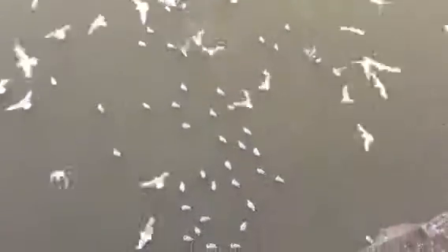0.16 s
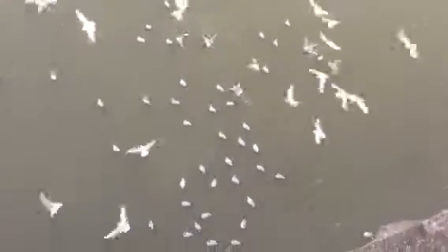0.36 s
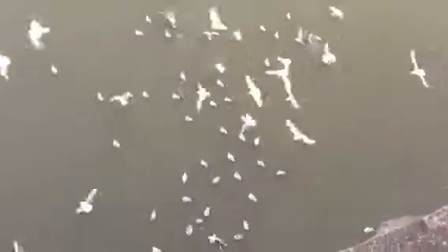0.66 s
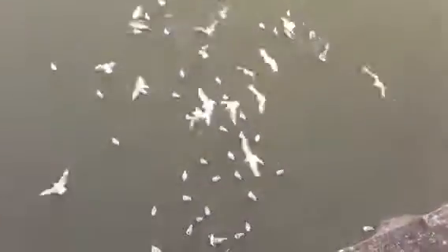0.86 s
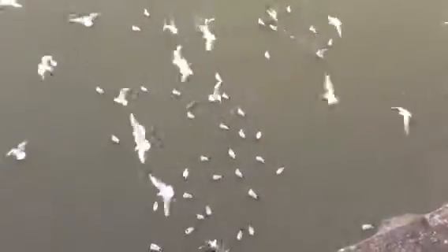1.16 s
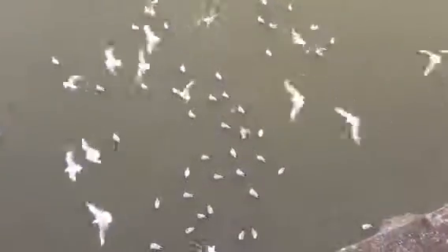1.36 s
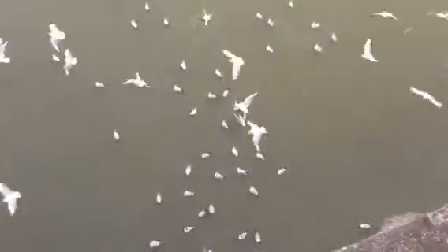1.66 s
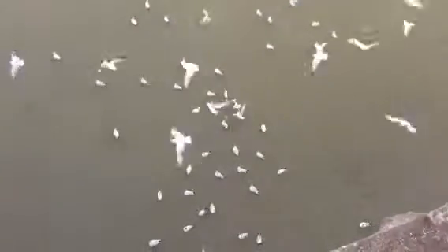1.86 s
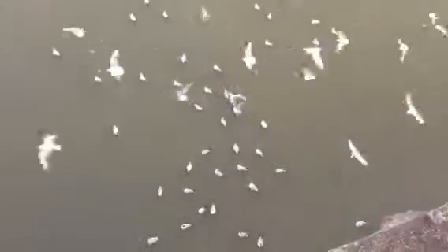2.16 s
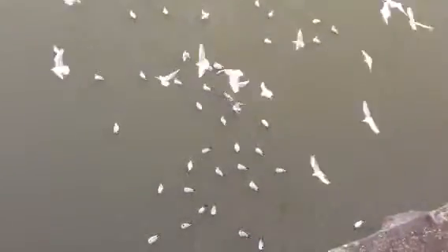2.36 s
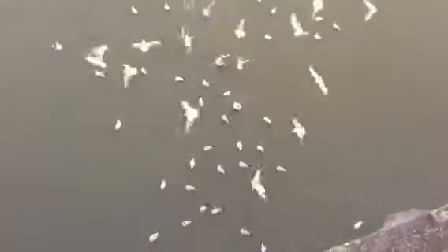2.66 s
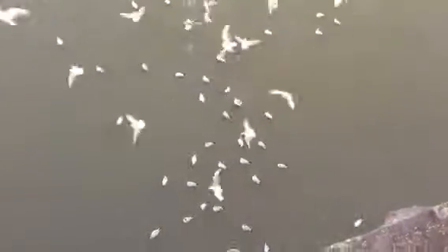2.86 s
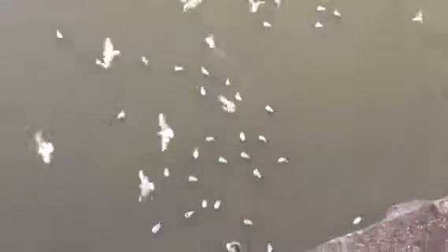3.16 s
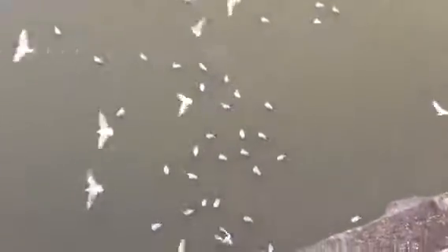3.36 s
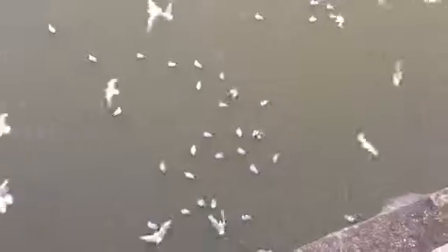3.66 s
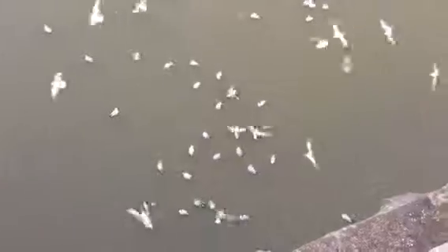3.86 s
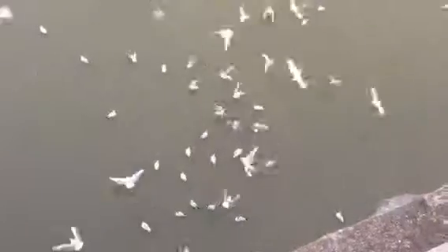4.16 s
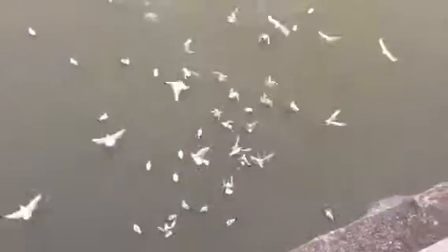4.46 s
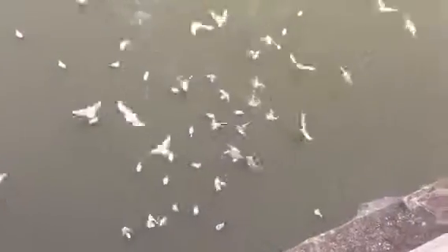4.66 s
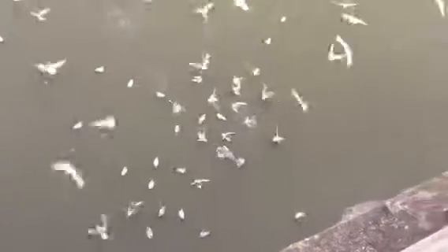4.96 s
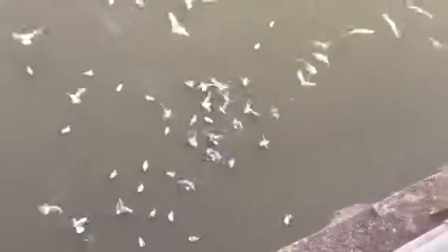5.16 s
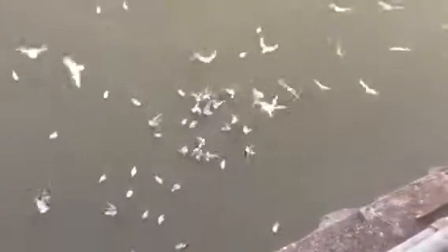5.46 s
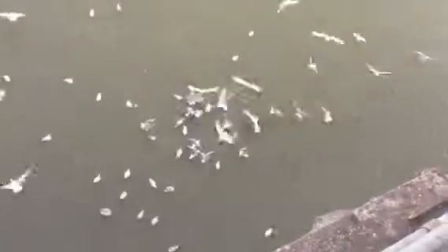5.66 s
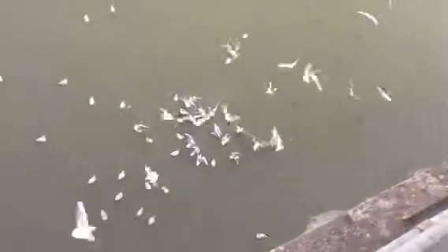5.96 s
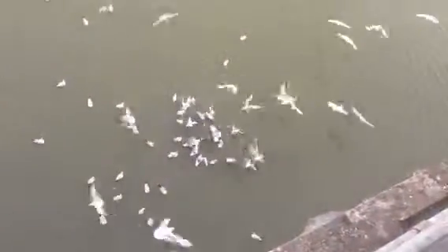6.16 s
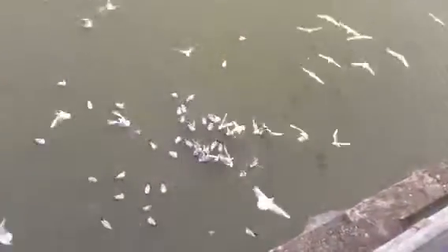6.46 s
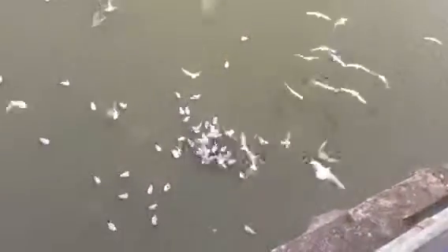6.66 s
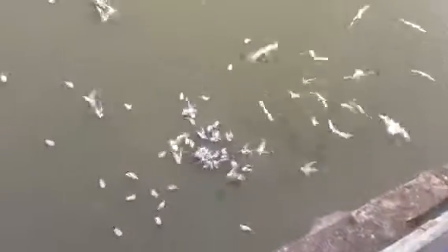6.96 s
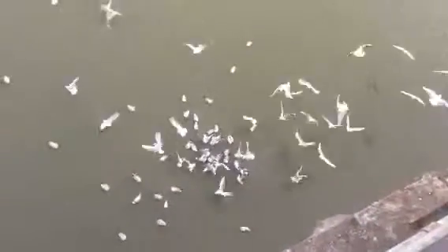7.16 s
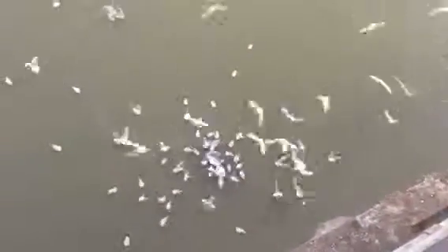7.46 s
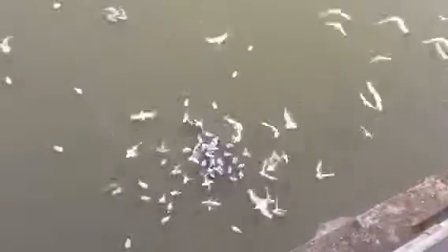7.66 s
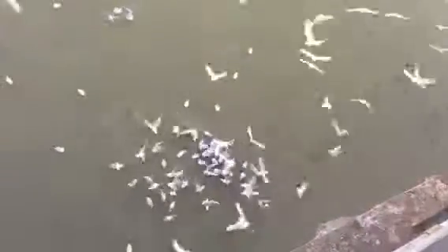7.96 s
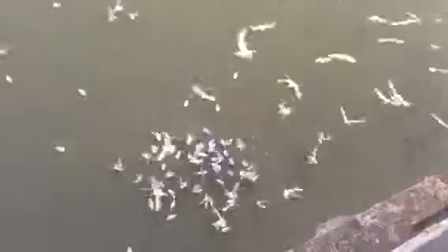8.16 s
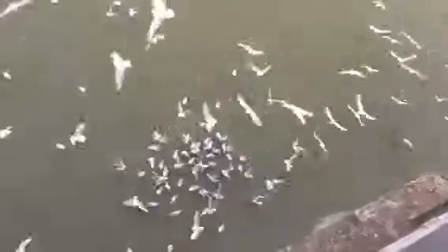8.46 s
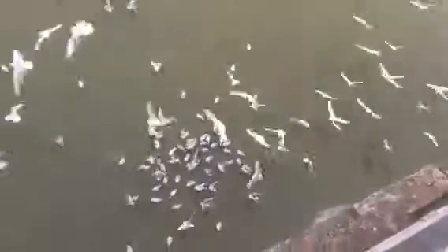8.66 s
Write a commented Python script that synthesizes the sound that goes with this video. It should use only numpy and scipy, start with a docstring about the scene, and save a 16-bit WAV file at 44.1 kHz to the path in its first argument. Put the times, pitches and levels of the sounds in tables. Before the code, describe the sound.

Gulls call over open water below a quay, each cry a short arch of pitch, raspy or trilled and reedy, with a weak echo. For the first 2 seconds the cries are scattered and fairly soft. From about 2 to 3.2 seconds they thin to a few faint calls and a thin falling whistle. Small dry ticks sound nearby, the clearest at about 2.7 and 4.1 seconds. From 3.4 seconds the screams and rasps return louder and more often, with occasional short yelps. Around 4.5 seconds a chorus of farther gulls swells behind them, growing brighter and busier until the end, near 9 seconds. Short falling whistles cut through at about 5.9 and 8 seconds, and strong cries stand out around 6.1 and 7.3 seconds. A faint wash of stirred water and a low outdoor rumble continue throughout.

```python
"""You hear gulls crying over open water below a quay, more and more as the feeding flock crowds together.
Each cry is a short arch of pitch near 1 kHz, trilled and reedy or torn into a rasp. The bird's voice
box buzzes, and its throat and open bill shape the sound. A few birds give short yelps or thin whistles.
Farther birds blur into a chorus, and the water and the quay wall send back a weak echo.
Small ticks sound nearby, over the wash of stirred water and a low outdoor rumble."""
import sys
import numpy as np
from scipy import signal
from scipy.fft import rfft, irfft, next_fast_len
from scipy.io import wavfile
from scipy.ndimage import uniform_filter1d, map_coordinates

SR = 44100
rng = np.random.default_rng(int(sys.argv[2]) if len(sys.argv) > 2 else 0)


def wav_out(sig):
    """Save sig, one row per channel (or a flat mono array), as 16-bit PCM at SR to the path in sys.argv[1]."""
    wavfile.write(sys.argv[1], SR, np.round(np.clip(np.atleast_2d(sig).T, -1, 1) * 32767).astype(np.int16))


N = 388080


def rasps(rough=0.859, excitement_db_per_s=0.69, margin_s=0.011):
    """Harsh cries of nearby gulls; a wider bill and growing excitement make them brighter."""
    # rasps: t/s, length/s, level/dB, bill resonance/Hz, fall of pitch/octaves (below 0 it rises)
    calls = [(0.016, 0.1, -45, 2110, -0.088), (0.077, 0.092, -39, 1570, 0.032),
             (0.185, 0.049, -46, 1507, 0.1), (0.33, 0.088, -38, 1900, 0.63),
             (0.385, 0.11, -42.5, 1786, 0.19), (0.555, 0.089, -43, 1953, 0.077),
             (0.74, 0.082, -43, 3340, 0.041), (0.781, 0.061, -41.5, 1818, 0.53),
             (0.971, 0.057, -49.5, 1446, 0.26), (1.204, 0.076, -48.5, 1863, 0.049),
             (1.687, 0.084, -38.5, 1976, -0.075), (2.819, 0.073, -50, 1557, 0.18),
             (3.247, 0.06, -41.5, 2400, 0.12), (3.716, 0.072, -36.5, 2340, 0.049),
             (4.05, 0.092, -36.5, 2553, 0.14), (4.368, 0.071, -34.5, 2610, -0.14),
             (4.462, 0.045, -33.5, 2414, -0.068), (5.054, 0.032, -43, 1850, 0.064),
             (5.415, 0.085, -35.5, 2117, 0.12), (5.564, 0.093, -36.5, 4120, -0.093),
             (5.63, 0.086, -32.5, 2515, -0.037), (5.853, 0.12, -30.5, 2860, 0.25),
             (6.068, 0.097, -25, 2270, -0.076), (6.259, 0.13, -27, 2404, 0.037),
             (6.358, 0.068, -36.5, 1994, 0.35), (6.49, 0.096, -33, 2400, -0.082),
             (6.704, 0.12, -28.5, 3075, 0.046), (6.95, 0.14, -34, 1977, 0.13),
             (7.754, 0.097, -37, 2010, -0.022), (8.051, 0.097, -29.5, 2360, 0.34),
             (8.135, 0.043, -33.5, 2620, 0.31), (8.201, 0.091, -31.5, 2896, -0.00032),
             (8.431, 0.093, -31, 1970, 0.037), (8.524, 0.051, -34, 2066, 0.22),
             (8.699, 0.066, -35.5, 2600, 0.054), (8.755, 0.065, -32.5, 2615, -0.08)]
    out = np.zeros(N)
    for start, length, db, bill_hz, fall in calls:
        opening = np.log2(bill_hz / 2300)
        pitch_hz = 950 * 2 ** (opening / 5)
        bright_db = 2.03 + 7 * opening + excitement_db_per_s * start
        sound = cry(length + 2 * margin_s, db, pitch_hz, bill_hz, bright_db, rough, fall)
        add(out, start - margin_s, sound)
    return out


def cry(length, db, pitch_hz, bill_hz, bright_db, rough, fall, bill_db=9, trill_hz=63, ripple_db=2.4):
    """One cry: the voice box buzzes, flutters and breaks into noise when forced (rough, 0 to 1)."""
    # how a gull's throat colours its voice: f/Hz, level/dB
    throat = [(60, -24), (1050, -12), (1350, 6), (1700, 7.5), (2100, 8.5), (3300, 1.5), (4400, -1),
              (5700, -10), (7000, -15), (8500, -21), (10500, -17), (12000, -21), (14500, -18)]
    size, rough = int(max(length, .02) * SR), np.clip(rough, 0, 1)
    u = np.linspace(-1, 1, size)  # start to end of the cry
    trill = np.clip(1.161 - rough, 0, 1)  # the cleaner the voice, the deeper its trill
    beats = np.cumsum(trill_hz * (1 + .22 * wander(rng, size, 82.8))) / SR
    flutter = abs(np.sin(np.pi * beats))  # rounded bursts with sharp gaps
    chirp = flutter / 2 + beats % 1 - 1  # pitch climbs through each burst and drops back
    waver = .02 * wander(rng, size, 50)
    jitter = .05 * rough * wander(rng, size, 1400)
    cycles = np.cumsum(pitch_hz * (1 + .1 * trill * chirp + waver + jitter)) / SR
    buzz = evened(sum(np.cos(2 * np.pi * (k * cycles + rng.random())) for k in range(1, 10)))
    # strong and weak cycles take turns
    buzz *= 1 + 1.1 * rough ** 2 * wander(rng, size, 120) * np.cos(np.pi * cycles)
    noise = wander(rng, size, SR) * (1 + 0.31 * np.cos(2 * np.pi * cycles))
    noise *= gain_of(2.7 * wander(rng, size, 471))
    noise = evened(signal.lfilter(*signal.butter(2, 6200, fs=SR), noise)) / np.sqrt(2)
    noise_share = .9 * rough ** 1.7
    source = np.sqrt(1 - noise_share) * buzz + np.sqrt(noise_share) * noise
    source *= 1 - trill + trill * flutter
    source *= gain_of(ripple_db * wander(rng, size, 60) / 2)  # no two bursts are equally strong
    ripple_hz = np.arange(0, SR / 2, 450)
    ripple = ripple_db * rng.standard_normal(len(ripple_hz))  # each windpipe has its own peaks and dips
    voice = coloured(source, lambda f: (
        read(throat, f) + np.interp(f, ripple_hz, ripple) + tilt(f, bright_db)
        + bill_db * hump(f, bill_hz, 0.036 * (.5 + rough))
        + (1 - rough) * 10 * hump(f, 5550, 0.047)))  # a clean voice also rings high in the throat
    # as the bill opens and shuts, pitch and resonances rise and fall together
    bend = (1 + .22 * (1 + rough) / 2 * (1 / 5 - u ** 2)) * 2 ** (-fall * u / 2)
    voice = map_coordinates(voice, [np.cumsum(bend)], mode="mirror")
    fades_s = .035 + .1 * rough  # harsh cries swell and fade more slowly
    pressure = signal.windows.tukey(size, fades_s / (size / SR)) * gain_of(-4 * u ** 2)
    dull = signal.filtfilt(*signal.butter(2, 2800, fs=SR), voice)  # weak pressure loses the treble
    direct = (dull + np.sqrt(pressure) * (voice - dull)) * pressure ** .8
    lag = int(rng.uniform(.0005, .005) * SR)  # the water below mirrors the cry a moment later
    return gain_of(db) * evened(np.pad(direct, (0, lag)) + .5 * np.pad(direct, (lag, 0)))


def screams(rise=0.08, drop=0.167, bright_db=-0.5, strain_db_per_octave=14):
    """Reedy calls of nearby gulls; the trilled ones get brighter as the pitch is strained upward."""
    # trilled screams: t/s, length/s, level/dB, middle pitch/Hz, bill resonance/Hz
    trilled = [(0.631, 0.1, -41, 820, 2470), (0.918, 0.063, -41.5, 887, 2600),
               (1.107, 0.095, -40.5, 855, 2520), (1.258, 0.059, -47.5, 904, 2700),
               (1.367, 0.076, -37, 994, 1950), (1.78, 0.073, -38.5, 930, 2880),
               (2.155, 0.056, -44.5, 874, 2580), (3.443, 0.12, -32, 1231, 3600),
               (3.667, 0.059, -32.5, 1086, 5430), (3.839, 0.1, -31, 1082, 1870),
               (4.132, 0.19, -29, 1103, 5300), (4.418, 0.06, -33.5, 1003, 2570),
               (4.676, 0.075, -30.5, 1034, 2800), (4.807, 0.081, -30.5, 868, 2580),
               (4.862, 0.074, -31, 963, 2720), (4.929, 0.07, -31.5, 926, 2800),
               (5.202, 0.098, -36.5, 999, 1920), (5.464, 0.0607, -31, 1073, 3140),
               (5.686, 0.055, -27.5, 1060, 1870), (6, 0.081, -31, 1197, 2450),
               (6.165, 0.048, -33, 1154, 3420), (6.611, 0.041, -40, 1085, 2260),
               (6.803, 0.062, -35.5, 1090, 2840), (6.862, 0.066, -33.5, 1138, 2930),
               (7.2, 0.073, -30.5, 989, 2780), (7.293, 0.19, -26.5, 1016, 2720)]
    # cleaner, held screams: t/s, length/s, level/dB, middle pitch/Hz, bill resonance/Hz
    held = [(4.743, 0.068, -32, 1080, 2170), (7.462, 0.17, -31.5, 1075, 4360),
            (7.643, 0.068, -35, 1010, 3980), (7.832, 0.16, -30, 1127, 5470)]
    out = np.zeros(N)
    sag = np.array([rise, 0, drop])  # share of the pitch lost at the start, middle and end
    for start, length, db, pitch_hz, bill_hz in trilled:
        strain_db = strain_db_per_octave * np.log2(pitch_hz / 1050)
        rough = min(.4 + 2 * length, .65)  # longer screams are rougher
        add(out, start, scream(length, db, pitch_hz * (1 - sag), bill_hz, bright_db + strain_db, rough))
    for start, length, db, pitch_hz, bill_hz in held:
        add(out, start, scream(length, db, pitch_hz * (1 - sag / 2), bill_hz, bright_db, rough=0.25))
    return out


def scream(length, db, pitches, bill_hz, bright_db, rough, trill_hz=63, fades_s=.042):
    """One scream: a stack of harmonics on an arch of pitch; each trill burst lifts pitch and level."""
    # how a screaming gull's throat colours its voice: f/Hz, level/dB
    throat = [(300, -40), (1100, -16), (1600, 5), (2100, 5.5), (3100, 4.5), (4400, 1.5), (4900, -4),
              (5500, 1.5), (6600, -4), (8000, -13), (10500, -31.5), (12000, -56)]
    size = int(length * SR)
    u = np.linspace(-1, 1, size)  # start to end of the scream
    beats = np.cumsum(trill_hz * (1 + .2 * wander(rng, size, 79.8))) / SR
    burst = abs(np.sin(np.pi * beats))
    arch_hz = glide(pitches, u)
    bend = arch_hz / arch_hz.max()  # the resonances ride on the arch
    waver = .014 * wander(rng, size, 60)
    jitter = .035 * rough * wander(rng, size, 1400)
    hz = arch_hz * (1 + .17 * rough * (burst - np.pi / 4) + waver + jitter)
    cycles = np.cumsum(hz) / SR
    pressure = signal.windows.tukey(size, fades_s / length)
    gap_db = -12 * rough * (1 - burst * pressure) ** 2
    voice = np.zeros(size)
    for k in range(1, 15):
        f = k * hz
        colour_db = read(throat, f / np.sqrt(bend)) + tilt(f, bright_db)
        colour_db += 6 * hump(f / bend, bill_hz, 0.064)
        flicker_db = 4 * wander(rng, size, 42.8)
        hoarseness = 1 + .9 * rough * wander(rng, size, 1100)
        harmonic = np.cos(2 * np.pi * (k * cycles + rng.random()))
        voice += gain_of(colour_db + gap_db + flicker_db) * hoarseness * harmonic
    breath = coloured(rng.standard_normal(size), lambda f: read(throat, f) + tilt(f, bright_db))
    voice = evened(voice) + .7 * rough * breath * burst  # rushing air tears through every burst
    fizz = coloured(rng.standard_normal(size), lambda f: 40 * hump(f, 9000, 0.45))
    voice += rough * gain_of(-17) * evened(fizz * burst ** 2)  # and fizzes at its top
    return gain_of(db) * evened(voice * pressure * gain_of(-3 * u ** 2))


def yelps(highest_pitch_hz=1100):
    """Short, relaxed calls in which the bill makes the second or third harmonic ring out."""
    # yelps: t/s, length/s, level/dB, ringing harmonic/Hz
    calls = [(2.279, 0.055, -53, 2190), (2.553, 0.031, -48, 1285), (3.6, 0.041, -42, 1698),
             (3.992, 0.066, -36.5, 2690), (4.589, 0.074, -42.5, 2560), (5.117, 0.072, -38.5, 2745),
             (5.351, 0.039, -38, 2580), (5.51, 0.066, -32, 1882)]
    out = np.zeros(N)
    for start, length, db, ring_hz in calls:
        pitch_hz = ring_hz / np.ceil(ring_hz / highest_pitch_hz)
        sound = cry(length, db, pitch_hz, ring_hz, bright_db=-6, rough=0.59, fall=0.069, bill_db=13)
        add(out, start, sound)
    return out


def whistles(overtone_db=-22, hoarse_db=3):
    """Thin calls: a hoarse, wavering tone that slides down through three pitches."""
    # whistles: t/s, length/s, level/dB, first pitch/Hz, middle pitch/Hz, last pitch/Hz
    calls = [(1.879, 0.2, -54, 2000, 1976, 1870), (2.599, 0.68, -55, 1990, 1890, 1420),
             (5.901, 0.077, -32, 3500, 2900, 2020), (7.971, 0.12, -41, 4490, 4000, 3720),
             (8.036, 0.08, -27, 3550, 3070, 2440)]
    out = np.zeros(N)
    for start, length, db, *pitches in calls:
        u = np.linspace(-1, 1, int(length * SR))
        hz = glide(pitches, u) * (1 + .06 * wander(rng, len(u), 900))
        angle = 2 * np.pi * np.cumsum(hz) / SR
        tone = np.sin(angle) + gain_of(overtone_db) * np.sin(2 * angle)
        tone *= gain_of(hoarse_db * wander(rng, len(u), 230))
        fade = signal.windows.tukey(len(u), .5) * (1 - u / 2)
        add(out, start, gain_of(db) * evened(tone * fade))
    return out


def far_gulls(count=240, brightening_db_per_s=1.15):
    """Distant cries at random moments blur into a chorus that brightens as the flock gathers."""
    out = np.zeros(N + SR // 4)  # the spare quarter second is cut from the front
    spread = (np.arange(count) + rng.random(count)) / count
    for start in 3.5 + spread * (len(out) / SR - 3.5):
        length, db, pitch_hz, bill_hz, strain, fall = rng.uniform(
            [.05, -7, 760, 1700, -.4, -.1], [.13, 5, 1180, 3000, .3, .3])
        bright_db = -5 + brightening_db_per_s * start
        add(out, start, cry(length, db, pitch_hz, bill_hz, bright_db, 0.554 + strain, fall))
    chorus = out[-N:]
    running_level = np.sqrt(abs(uniform_filter1d(chorus ** 2, size=4000)) + 1e-6)
    return chorus / running_level * commotion(frenzy_db=-33, follows=.95)


def commotion(frenzy_db, follows, lull_s=0.026):
    """A layer's gain: frenzy_db when the flock is at -36 dB, moving 'follows' dB for each dB of it."""
    # how busy the flock is: t/s, level/dB
    bustle = [(0, -54), (1.3, -66), (2.3, -103), (3.4, -66), (4.7, -40.5), (5.6, -39.5), (6.3, -36.5),
              (8.8, -31.5)]
    # short lulls when the birds fall quiet together: t/s, depth/dB
    lulls = [(4.34, -9.5), (5.03, -25), (6.235, -12), (6.45, -7.5), (7.118, -6), (7.715, -7.5)]
    t = np.arange(N) / SR
    lull_db = sum(db * np.exp(-((t - middle) / lull_s) ** 2) for middle, db in lulls)
    flock_db = np.interp(t, *np.transpose(bustle)) + lull_db
    return gain_of(frenzy_db + follows * (flock_db + 36))


def quay_echo(x, decay_s=0.38, wall_s=0.021, wall_spread_s=0.026):
    """Weak, dull reflections off the water, with a blurred echo from the quay wall."""
    t = np.arange(SR) / SR
    wall_db = 5 * np.exp(-((t - wall_s) / wall_spread_s) ** 2)
    bounces = rng.standard_normal(SR) * (rng.random(SR) < 2000 / SR) * (t > .008)
    bounces *= gain_of(wall_db - 60 * t / decay_s)
    tail = coloured(bounces, lambda f: -6 * np.log2(np.maximum(f, 2000) / 2000))
    return gain_of(-11) / 2 * signal.fftconvolve(x, tail / np.linalg.norm(tail))[:N]


def ticks(decay_s=0.0016, faint_count=30):
    """Dry snaps of noise that die at once: a few sharp ones, and faint ones at random moments."""
    # sharp ticks: t/s, level/dB, centre f/Hz
    sharp = [(0.189, -35, 5770), (2.373, -38, 1700), (2.668, -30.5, 4460), (4.082, -25, 3270)]
    faint = rng.uniform([0, -57, 2000], [N / SR, -48, 8000], (faint_count, 3))
    out, t = np.zeros(N), np.arange(1024) / SR
    for start, db, hz in [*sharp, *faint]:
        noise = coloured(rng.standard_normal(len(t)), lambda f: 24 * hump(f, hz, octaves=1))
        add(out, start, gain_of(db) * noise * np.exp(-t / decay_s))
    return out


def water(drops_per_s=500, splash_s=0.041, spray_hz=6000):
    """Paddling and splashing: drops of many sizes in a lumpy wash, with fine spray on top."""
    # tone colour of stirred water: f/Hz, level/dB
    colour = [(100, -41), (230, -5.5), (600, -10.5), (1100, -15.5), (15000, -29)]
    # birds hitting the water: t/s, level/dB
    splashes = [(.63, -54), (4.55, -56), (7.17, -51)]
    t = np.arange(N) / SR
    hits = rng.random(N) < drops_per_s / SR
    drop_db = 3 * np.minimum(rng.exponential(1, N), 5)
    drops = hits * gain_of(drop_db) * rng.choice([-1, 1], N)
    stirred = (drops + 0.26 * rng.standard_normal(N)) * gain_of(2 * wander(rng, N, 25))
    plunges = sum(gain_of(db) * np.exp(-((t - middle) / splash_s) ** 2) for middle, db in splashes)
    wash = coloured(stirred, lambda f: read(colour, f))
    wash *= commotion(frenzy_db=-51, follows=0.13) + plunges
    spray = evened(signal.lfilter(*signal.butter(1, [spray_hz, SR / 3], "bandpass", fs=SR), stirred))
    return wash + spray * commotion(frenzy_db=-57.5, follows=1.5)


def air(db=-54):
    """Steady distant rumble and faint hiss."""
    # tone colour of the outdoor air: f/Hz, level/dB
    colour = [(25, -28), (80, -23), (120, -3), (155, 4), (280, -8.5), (600, -29), (1500, -11.5),
              (15000, -59)]
    return gain_of(db) * coloured(rng.standard_normal(N), lambda f: read(colour, f))


def gain_of(db):
    """Turns decibels into a number to multiply by."""
    return 10 ** (np.asarray(db) / 20)


def evened(x):
    """Scales a sound to an average (rms) level of 1."""
    return x / np.sqrt(np.mean(x ** 2) + 1e-20)


def read(points, hz):
    """Looks up the level at hz in a table of f/Hz, level/dB, with octaves evenly spaced."""
    f, db = np.transpose(points)
    return np.interp(np.log(hz + 1), np.log(f + 1), db)


def add(mix, start, sound):
    """Mixes a sound in at a start time in seconds."""
    part = mix[max(round(start * SR), 0):][:len(sound)]
    part += sound[:len(part)]


def coloured(x, db_at):
    """Boosts or cuts each frequency f by db_at(f), then scales the level to 1."""
    size = next_fast_len(len(x) + 256)
    gains = gain_of(db_at(np.fft.rfftfreq(size, 1 / SR)))
    return evened(irfft(rfft(x, size) * gains, size)[:len(x)])


def wander(dice, size, hz):
    """A random curve, about 1 in size, that heads for a new value hz times a second."""
    at = np.arange(size) * hz / SR
    points = np.random.default_rng(dice.integers(2 ** 32)).standard_normal(int(at[-1]) + 2)
    return np.interp(at, np.arange(len(points)), points)


def hump(hz, centre_hz, octaves):
    """A bell-shaped peak of height 1 around centre_hz."""
    return np.exp(-.5 * (np.log2((hz + 1) / centre_hz) / octaves) ** 2)


def tilt(hz, db_per_octave):
    """Brightness: a slope in dB between 1.5 and 6 kHz."""
    return db_per_octave * np.log2(np.clip(hz, 1500, 6000) / 2500)


def glide(pitches, u):
    """A smooth curve through three pitches as u runs from -1 to 1."""
    return np.polyval(np.polyfit([-1, 0, 1], pitches, 2), u)


def scene():
    """Gulls with their echo, over ticks, water and air."""
    gulls = rasps() + screams() + yelps() + whistles() + far_gulls()
    return (gulls + quay_echo(gulls) + ticks() + water() + air())[None]


def record(dry):
    """Cuts the highest treble, above 15250 Hz."""
    low_pass = signal.firwin(1023, 15250, window=("kaiser", 9), fs=SR)
    return signal.oaconvolve(dry, low_pass[None], "same")


dry = scene()
out = record(dry)
wav_out(out)
```